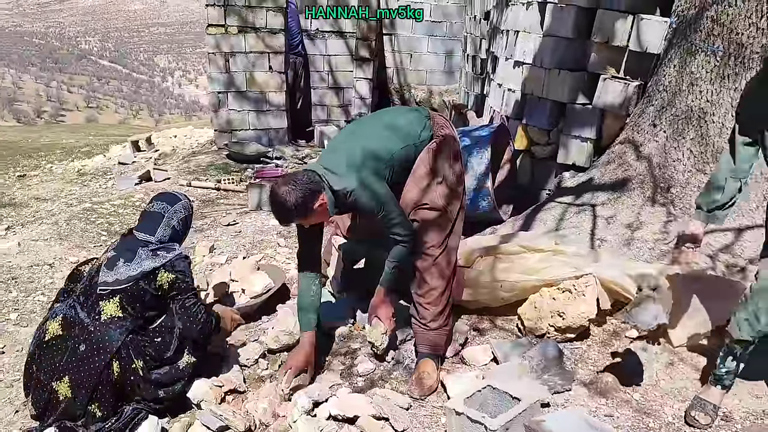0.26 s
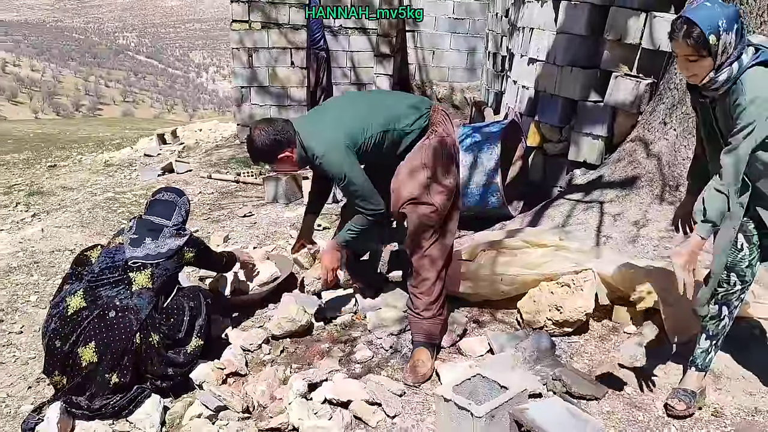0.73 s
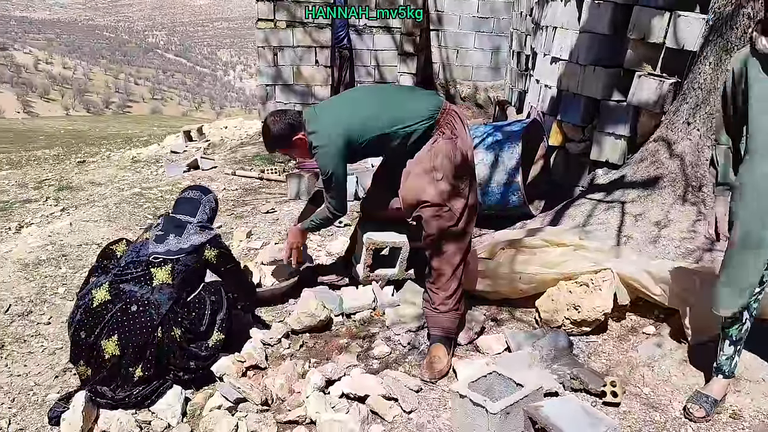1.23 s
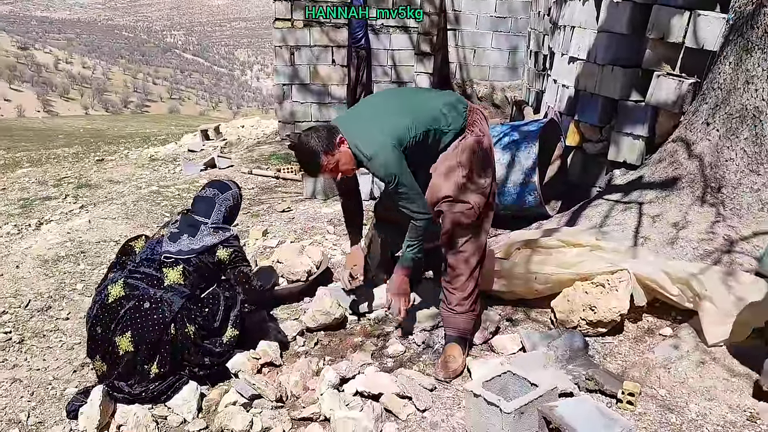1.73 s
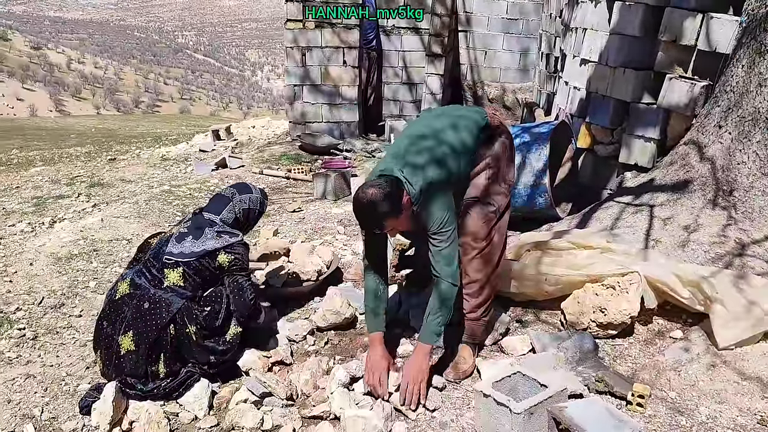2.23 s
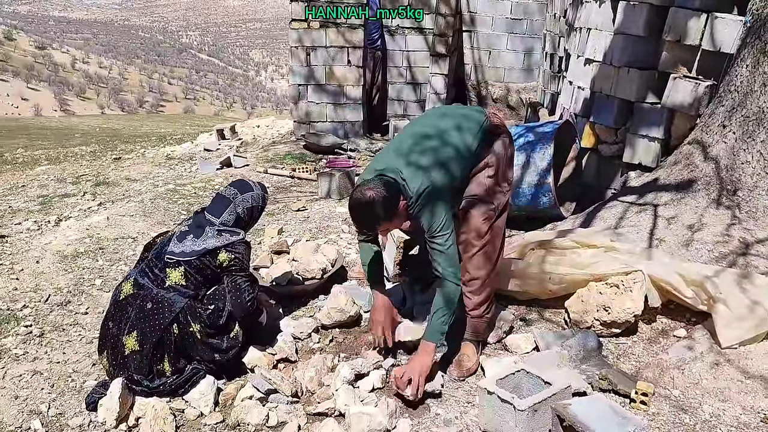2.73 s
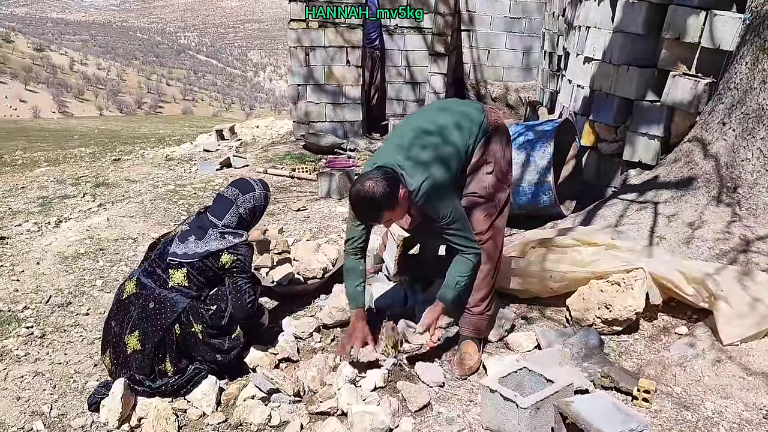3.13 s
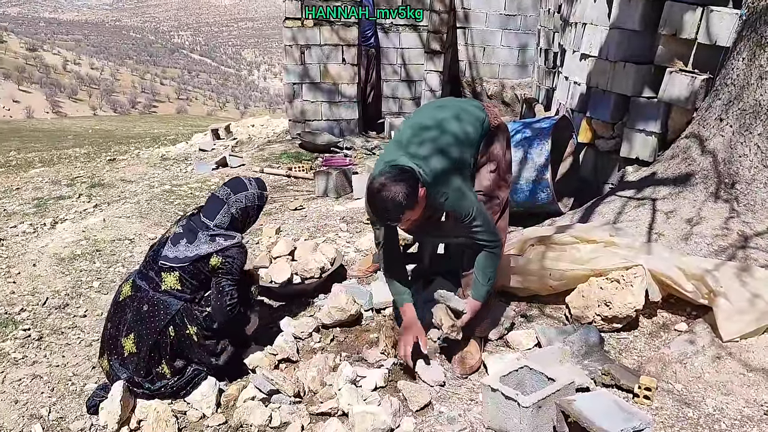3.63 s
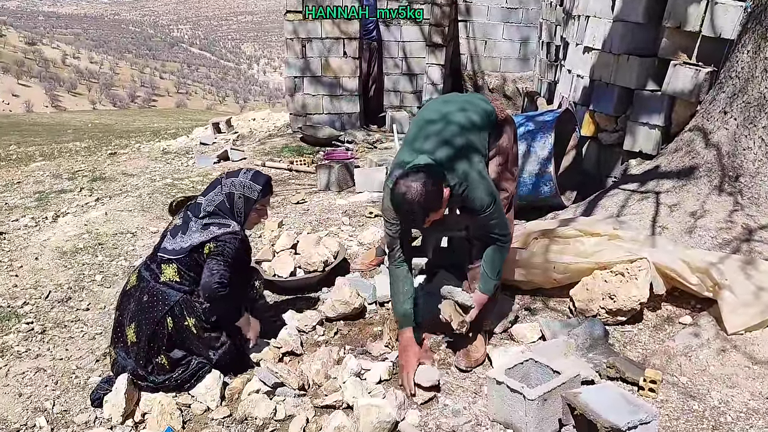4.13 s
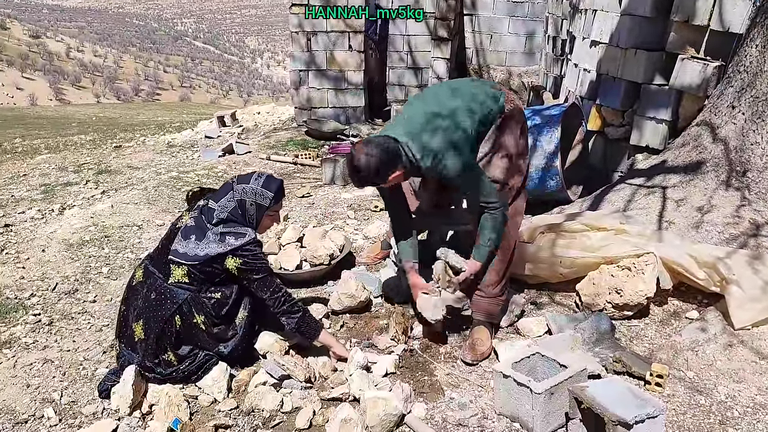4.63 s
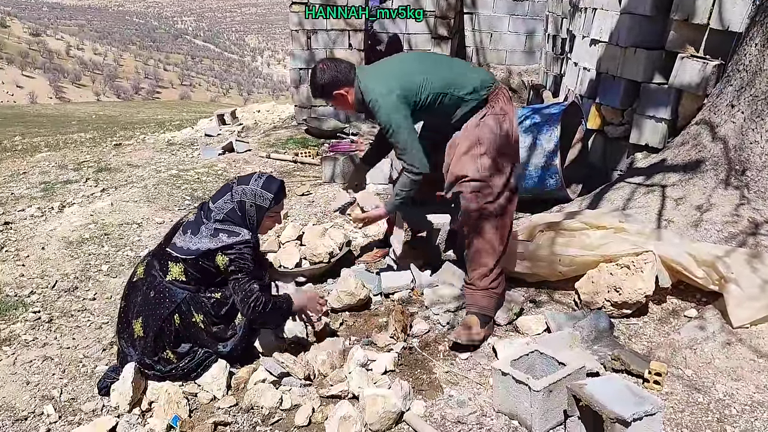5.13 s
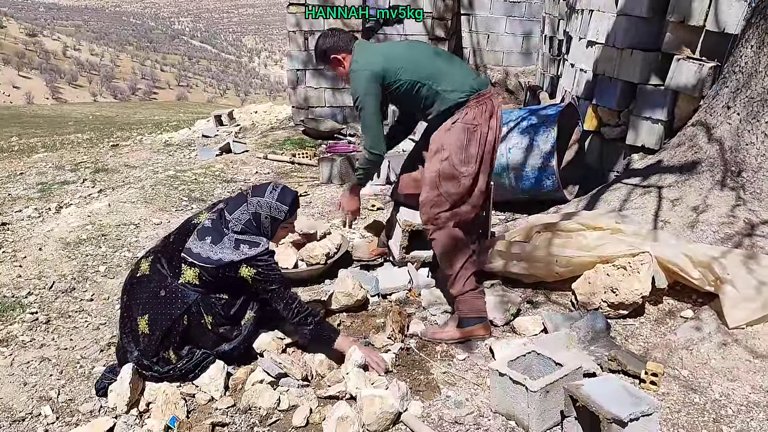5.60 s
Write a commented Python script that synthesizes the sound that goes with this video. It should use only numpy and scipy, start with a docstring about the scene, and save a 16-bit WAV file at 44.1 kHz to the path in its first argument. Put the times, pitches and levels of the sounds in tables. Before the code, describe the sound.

Loose rocks knock and clack onto a heap outdoors, with crunching grit and a breeze buffeting the microphone.

```python
"""Loose rocks drop on a heap outdoors, near a phone with a left and a right microphone opening (port).
From the start the hills hush and a breeze buffets each port on its own. Two flurries of knocks fill the
first two seconds: each stone rings briefly and crunches, grit trickles and a few pebbles clink.
More knocks follow, with the strongest wind thumps near 2.6 and 3.5 s. The knocks then thin out to
light taps, until a last handful lands around 5.5 s."""
import sys
import numpy as np
from scipy import signal
from scipy.fft import rfft, irfft, next_fast_len
from scipy.io import wavfile
from scipy.ndimage import map_coordinates

SR = 44100
rng = np.random.default_rng(int(sys.argv[2]) if len(sys.argv) > 2 else 0)


def put_to_file(sound):
    """Save the sound as 16-bit audio at rate SR, in the file named by the first command-line argument."""
    columns = np.atleast_2d(sound).T  # one column per channel
    safe = np.clip(columns, -1, 1)
    whole_steps = np.round(safe * 32767)
    wavfile.write(sys.argv[1], SR, whole_steps.astype(np.int16))


N = 258426

# Tone of the far hills: (frequency [Hz], level [dB])
HUSH_TONE = [(240, -30), (400, -7), (1240, -15.5), (5390, -32.5), (8200, -35), (13700, -27), (15500, -75)]
# The breeze over time: (time [s], level [dB], left minus right [dB])
BREEZE = [(0.0, -26, -8), (0.08, -42.5, -4.5), (1.37, -36.5, 15.5), (1.82, -34, 0.5), (1.91, -48.5, 6),
          (2.07, -34.5, 9.5), (2.5, -37, -2), (2.7, -30, -12), (2.85, -39, -9), (3.35, -33.5, 14.5),
          (3.56, -35.5, -5), (3.9, -41, -6.5), (4.1, -36.5, 8), (5.26, -35.5, 4.5), (5.45, -29.5, 10),
          (5.61, -36.5, -1), (5.79, -29.5, 2.5)]
# Tone of the wind's low rumble: (frequency [Hz], level [dB])
RUMBLE_TONE = [(20, -13), (118, -2.5), (352, -27), (500, -51.5), (1100, -120)]
# Tone of the flutter in strong gusts: (frequency [Hz], level [dB])
FLUTTER_TONE = [(90, -7.5), (200, 3.5), (350, -15.5), (600, -23), (1200, -53), (2500, -120)]
# Bursts of air on the ports: (time [s], level [dB], pitch [Hz], left minus right [dB])
AIR_BURSTS = [(1.343, -29.5, 139, 15), (1.705, -20.5, 180, -33.5), (2.53, -24, 240, -33),
              (2.6, -10.5, 288, -22), (2.688, -20.5, 310, -35), (2.719, -20.5, 159, 34),
              (2.897, -27, 176, -24), (3.474, -14, 223, -41), (3.559, -20, 163, -15),
              (3.659, -23, 215, -30), (3.964, -18, 248, -34), (3.984, -18, 185, -38),
              (4.736, -25, 195, -23), (4.952, -26.5, 219, -28), (5.424, -18, 152, 16.5),
              (5.633, -19, 159, -34)]
# Hands stir the gravel: (start [s], length [s], trickle level [dB], scrape level [dB])
HAND_STIRS = [(0.375, 0.067, -57, -53), (0.495, 0.65, -69.5, -57), (1.396, 0.33, -71, -58),
              (2.258, 0.87, -70.5, -64), (3.82, 0.28, -77, -70), (4.073, 0.034, -62, -68),
              (4.205, 0.391, -70, -67.5), (4.831, 0.097, -62.5, -74), (5.572, 0.21, -61.5, -66)]
# Gravel between stirs: (trickle level [dB], scrape level [dB])
RESTING_GRIT = [-77, -74]
# Tone of stones scraping: (frequency [Hz], level [dB])
SCRAPE_TONE = [(180, -6.5), (594, -10.5), (778, -14.5), (1670, -18), (2620, -29), (5000, -63),
               (6500, -34.5), (11000, -120)]
# Bright tone of cracks, high pings and trickling grit: (frequency [Hz], level [dB])
BRIGHT_TONE = [(1470, -2), (2500, -4.5), (3740, 0.5), (4410, -0.5), (5870, -8), (7950, -19.5), (9150, -6.5),
               (10800, -10.5), (13300, -12), (14600, -27), (16300, -43)]
# Hard pebbles and flakes that ring on: (time [s], level [dB], pitch [Hz])
PEBBLES = [(0.425, -37.5, 9690), (0.644, -28.5, 1430), (1.057, -50, 5740), (1.122, -54.5, 5670),
           (1.179, -54, 5500), (1.237, -52.5, 5430), (3.501, -51, 11900), (3.528, -40.5, 9280)]
# Rocks landing: (time [s], level [dB], pitch [Hz], crack relative to level [dB], crunch fade [s])
ROCK_HITS = [(0.264, -47, 1470, -24, 0.13), (0.371, -26.5, 1760, -25, 0.19),
             (0.398, -17, 1776, -38.5, 0.01), (0.424, -23.5, 1270, -21, 0.097),
             (0.44, -23.5, 1880, -42, 0.1), (0.513, -25.5, 1424, -5, 0.072), (0.522, -18, 1150, -27, 0.036),
             (0.556, -42, 1010, 0, 0.092), (0.606, -29.5, 1330, -11.5, 0.034),
             (0.644, -27, 1360, -20, 0.094), (0.675, -34.5, 2040, -27, 0.055),
             (0.717, -24.5, 625, -31.5, 0.089), (0.748, -30.5, 1130, -20.5, 0.09),
             (0.8, -33, 1220, -15, 0.17), (0.839, -31.5, 830, -35, 0.13), (0.908, -34.5, 795, -15, 0.054),
             (0.987, -11, 1210, -18.5, 0.019), (0.992, -17.5, 1770, -20, 0.048),
             (1.029, -28.5, 1120, -9, 0.14), (1.07, -20.5, 1410, -43, 0.078), (1.236, -35, 940, -21, 0.077),
             (1.351, -45.5, 1900, -4, 0.26), (1.394, -21.5, 613, -20.5, 0.069),
             (1.418, -18.5, 1090, -38, 0.095), (1.424, -20, 1780, -30, 0.058),
             (1.443, -20, 634, -24.5, 0.071), (1.472, -24.5, 906, -27, 0.15), (1.501, -42, 940, -16, 0.055),
             (1.598, -15, 676, -34.5, 0.056), (1.686, -32, 840, -22, 0.0086),
             (1.723, -33, 915, -19.5, 0.043), (2.195, -23, 1670, -21, 0.053),
             (2.195, -26.5, 574, -29, 0.074), (2.226, -28.5, 1230, -22, 0.16), (2.455, -48, 794, -5, 0.031),
             (2.498, -36.5, 834, -40, 0.11), (2.536, -38, 1110, -4, 0.24), (2.572, -22, 434, -26, 0.075),
             (2.576, -39.5, 1260, -11, 0.34), (2.774, -23.5, 1330, -28.5, 0.017),
             (2.779, -20.5, 1720, -37, 0.014), (2.786, -35, 1270, -40, 0.041),
             (2.991, -45.5, 1970, -9.5, 0.074), (3.019, -50.5, 1196, -3, 0.11),
             (3.162, -28, 1460, -27, 0.04), (3.285, -47, 1510, -32, 0.033), (3.398, -31, 1770, -2, 0.07),
             (3.404, -39.5, 950, -4, 0.054), (3.501, -22, 1180, -29, 0.061), (3.516, -20.5, 904, -23, 0.07),
             (3.526, -19.5, 1180, -32, 0.092), (3.552, -28.5, 1360, -21.5, 0.057),
             (3.798, -28.5, 1260, -37, 0.035), (3.902, -49, 790, -2.5, 0.049),
             (4.019, -36.5, 2030, 2.5, 0.045), (4.212, -35.5, 1945, -14, 0.04),
             (4.427, -45.5, 1980, -14, 0.02), (4.464, -37, 1520, -19.5, 0.026),
             (4.81, -33.5, 796, -2.5, 0.092), (5.435, -45.5, 1930, -11, 0.081),
             (5.523, -37, 940, -12.5, 0.084), (5.53, -18.5, 680, -14, 0.041), (5.586, -49, 2170, 4, 0.29),
             (5.686, -26, 840, -24, 0.27), (5.702, -21, 1416, -13.5, 0.064), (5.716, -22, 885, -47, 0.093),
             (5.733, -26.5, 1500, -38, 0.11)]
# The notes one stone rings with: (multiple of its pitch [ratio], level [dB], base fade [s])
STONE_NOTES = [(.6, -1, 0.014), (1, 4, 0.018), (1.299, -18, 0.034), (1.15, 2, 0.0036)]
# Echo off the heap and a wall: (frequency [Hz], fade [s])
ECHO_FADES = [(500, 0.31), (10000, 0.14)]
# Which port hears the heap louder: (frequency [Hz], left minus right [dB])
PORT_BALANCE = [(1220, 1.5), (2010, 8), (3330, -5), (5500, 11.5), (9080, -12), (15000, 0)]
# The left port lags in the treble: (frequency [Hz], left minus right phase [radians])
PORT_PHASE = [(2400, 0), (6100, -6), (9800, -9.5), (15000, -14.5)]

SIDE = np.array([[.5], [-.5]])  # shares a left-right difference between the two ports
HIT_SAMPLES = 8192
HIT_TIME, HIT_HZ = np.arange(HIT_SAMPLES) / SR, np.fft.rfftfreq(HIT_SAMPLES, 1 / SR)


def amp(db):
    """Turn decibels into a volume multiplier."""
    return 10 ** (np.asarray(db) / 20)


def fade(t, fade_s):
    """Die away by 60 dB every fade_s seconds; all fade times here mean this."""
    return amp(-60 * t / fade_s)


def strike(rise_s, fade_s):
    """The loudness of one hit: a quick rise, then a fade."""
    return (1 - np.exp(-HIT_TIME / rise_s)) * fade(HIT_TIME, fade_s)


def unit(x):
    """Scale a sound to an average strength (rms) of 1."""
    return x / np.sqrt(np.mean(x ** 2, axis=-1, keepdims=True) + 1e-20)


def along(table, hz):
    """Read between the rows of a (frequency, value) table, on a musical scale."""
    freqs, values = np.transpose(table)
    return np.interp(np.log(hz + 1), np.log(freqs + 1), values)


def wobble(rate):
    """A smooth curve through `rate` random values a second."""
    return map_coordinates(rng.standard_normal(N // 100), [np.arange(N) * rate / SR])


def filtered(x, response):
    """Multiply each frequency in a sound by response(frequency)."""
    size = next_fast_len(N + 8192)
    return irfft(rfft(x, size) * response(np.fft.rfftfreq(size, 1 / SR)), size)[..., :N]


def coloured(x, tone):
    """Give a sound the tone in a table, at strength 1."""
    return unit(filtered(x, lambda hz: amp(along(tone, hz))))


def add(track, time_s, sound):
    """Mix a sound into both channels of a track, starting at time_s."""
    part = track[:, round(time_s * SR):][:, :sound.shape[-1]]
    part += sound[..., :part.shape[1]]


def piece(noise, time_s, samples=HIT_SAMPLES):
    """Cut out a piece of noise, with silence past its end."""
    part = noise[:, round(time_s * SR):][:, :samples]
    return np.pad(part, ((0, 0), (0, samples - part.shape[1])))


def grains(clump_db, spike_db, clump_rate, apart):
    """Many tiny contacts make clumpy, spiky noise; `apart` sets how much the two ports differ."""
    shared, left, right = rng.standard_normal((3, N))
    loudness = amp(clump_db * wobble(clump_rate) + spike_db * wobble(400))
    return loudness * (shared + apart * np.array([left, right]))


def hills():
    """A faint, steady hush from far away."""
    return amp(-69.5) * coloured(rng.standard_normal((2, N)), HUSH_TONE)


def thumps(flutter):
    """A swirl of air passes the ports: a few slowing swings and a ragged wake."""
    out = np.zeros((2, N))
    t = np.arange(-2000, 2400) / SR
    for time_s, db, hz, pan_db in AIR_BURSTS:
        cycles = t * hz - .8
        swell = np.exp(-np.hypot(cycles / 0.5, 0.22) ** 0.81)
        swings = np.sin(2 * np.pi * cycles * (1.4 - 0.32 * cycles))
        wake = 0.38 * np.exp(-(cycles / 2.2) ** 2) * piece(flutter, time_s + t[0], len(t))
        port_gain = amp(db + np.minimum([[pan_db], [-pan_db]], 0))
        add(out, time_s + t[0], port_gain * (swell * swings + wake))
    return out


def wind():
    """Lumpy air rumbles and thumps on each port; strong gusts reach higher, and the left is duller."""
    def per_port(rate):
        return np.array([wobble(rate), wobble(rate)])

    times, *columns = np.transpose(BREEZE)
    level_db, pan_db = (np.interp(np.arange(N) / SR, times, column) for column in columns)
    gust_db = level_db + np.minimum([pan_db, -pan_db], 0)
    gust_db += 10 * np.tanh(0.4 * per_port(16)) + 2.63 * per_port(45)
    rumble = filtered(rng.standard_normal((2, N)),
                      lambda hz: amp(along(RUMBLE_TONE, hz) - SIDE * 4.4 * np.log2((hz + 1) / 100)))
    flutter = coloured(rng.standard_normal((2, N)), FLUTTER_TONE) * amp(2.9 * per_port(30))
    flutter_db = 1.67 * (gust_db + 38.5) - 53 - 12 * SIDE  # grows faster than the rumble
    return amp(gust_db) * unit(rumble) + amp(flutter_db) * flutter + thumps(flutter)


def echo(x):
    """Sound scatters off heap and wall: a short tail, new for each port and each quarter second."""
    out, step = np.zeros((2, N)), SR // 4
    for start in range(0, N, step):
        hz, t, noise = signal.stft(rng.standard_normal((2, step)), SR, nperseg=128)
        tail = signal.istft(noise * fade(t, along(ECHO_FADES, hz)[:, None]), SR, nperseg=128)[1]
        tail /= np.linalg.norm(tail[0])
        add(out, (start + 90) / SR, signal.fftconvolve(x[None, start:start + step], tail, axes=1))
    return out


def grit(rise_s=0.033, fade_s=0.13):
    """Fine gravel trickles between the stones and makes them scrape, more while a hand stirs it."""
    t = np.arange(N) / SR
    flow = amp(RESTING_GRIT)[:, None]
    for start_s, length_s, *levels_db in HAND_STIRS:
        swell = np.clip((t - start_s) / rise_s, 0, 1)
        dying = fade(np.maximum(t - start_s - length_s, 0), fade_s)
        flow = flow + amp(levels_db)[:, None] * swell * dying
    trickle = grains(clump_db=4.5, spike_db=4.5, clump_rate=78, apart=1)
    scrape = grains(clump_db=1, spike_db=4.5, clump_rate=15, apart=1)
    return flow[0] * coloured(trickle, BRIGHT_TONE) + flow[1] * coloured(scrape, SCRAPE_TONE)


def clinks():
    """A hard pebble rings with its own note and a softer one just below."""
    out = np.zeros((2, N))
    for time_s, db, hz in PEBBLES:
        phase = 2 * np.pi * hz * HIT_TIME
        notes = np.sin(phase) + amp(-8.5) * np.sin(0.93 * phase)
        add(out, time_s, amp(db) * strike(rise_s=0.0012, fade_s=0.045) * notes)
    return out


def high_pings():
    """Each hit carries a brief high ring of eight random pitches."""
    out = np.zeros((2, N))
    for time_s, db, _, crack_db, _ in ROCK_HITS:
        ping_hz = 3000 * 4.5 ** rng.random((8, 1))
        pings = np.sin(2 * np.pi * ping_hz * HIT_TIME).sum(axis=0)
        add(out, time_s, amp(db + crack_db - 9.5) * strike(rise_s=0.00057, fade_s=0.016) * pings)
    return out


def settling(crunch_s):
    """The loudness of gravel giving way under a stone: it swells, then fades."""
    swell = 1 - np.exp(-(HIT_TIME / (0.026 * crunch_s)) ** 2)
    return swell * fade(HIT_TIME, max(crunch_s, .01))


def looseness(crunch_s):
    """A stone that takes long to settle grinds more and rings less."""
    return (crunch_s / 0.067) ** 0.3


def cracks(lead_in_s=0.0053, bands=8):
    """Each crack fades in faintly over about 5 ms, then snaps and crackles in the gravel."""
    out = np.zeros((2, N))
    splinters = grains(clump_db=1, spike_db=3.5, clump_rate=71, apart=0.88)
    lead_in_rise = amp(np.linspace(-28, -14, round(lead_in_s * SR)))
    snap = 1.45 * fade(HIT_TIME, 0.023) * (1 - np.exp(-(HIT_TIME / 0.0016) ** 2))
    band_hz = HIT_HZ[-1] * np.linspace(0, 1, bands) ** 2
    for time_s, db, _, crack_db, crunch_s in ROCK_HITS:
        gain = amp(db + crack_db)
        lead_in = lead_in_rise * piece(splinters, time_s - lead_in_s, len(lead_in_rise))
        add(out, time_s - lead_in_s, gain * lead_in)
        tone = amp(3 * np.interp(HIT_HZ, band_hz, rng.standard_normal(bands)))  # new for every crack
        crackle = irfft(rfft(piece(splinters, time_s)) * tone)
        add(out, time_s, gain * (snap + 0.4 * settling(crunch_s)) * crackle)
    return out


def crunches():
    """A stone grinds into the gravel, which shakes it broadly around its own pitch."""
    out = np.zeros((2, N))
    rubble = grains(clump_db=0, spike_db=3, clump_rate=90, apart=0.7)
    scrape_tone = amp(along(SCRAPE_TONE, HIT_HZ) + 16)
    for time_s, db, hz, _, crunch_s in ROCK_HITS:
        grinding = settling(crunch_s) * piece(rubble, time_s)
        resonance = 0.56j * HIT_HZ * hz / (hz ** 2 - HIT_HZ ** 2 + 0.83j * HIT_HZ * hz)
        crunch = irfft(rfft(grinding) * (resonance + 0.5) * scrape_tone)
        add(out, time_s, amp(db - 3) * looseness(crunch_s) * crunch)
    return out


def knocks():
    """A struck stone rings with a few short notes, then bounces once about 4 ms later."""
    out = np.zeros((2, N))
    for time_s, db, hz, _, crunch_s in ROCK_HITS:
        detunes, strengths, bounce = rng.standard_normal((3, len(STONE_NOTES)))
        damping = (0.13 / crunch_s) ** 0.2  # a short, held contact stops the ring sooner
        ring = np.zeros(HIT_SAMPLES)
        for (ratio, note_db, fade_s), detune, strength in zip(STONE_NOTES, detunes, strengths):
            if ratio != 1:  # all but the main note vary from hit to hit
                ratio *= 1 + 0.056 * detune
                note_db += 3 * strength
            note = np.sin(2 * np.pi * hz * ratio * HIT_TIME)
            ring += amp(note_db) * strike(rise_s=0.00078, fade_s=fade_s / damping) * note
        add(out, time_s, amp(db - 6) * ring / looseness(crunch_s))
        add(out, time_s + 0.00395 + 0.00095 * bounce[0], amp(db - 19.5 + 5 * bounce[1]) * ring)
    return out


def scene():
    """The heap reaches each port with its own tone and delay; wind blows on the ports directly."""
    def at_ports(hz):
        return amp(SIDE * along(PORT_BALANCE, hz)) * np.exp(1j * SIDE * along(PORT_PHASE, hz))

    rings, pings, gravel = knocks(), high_pings(), crunches()
    bright = filtered(cracks() + pings, lambda hz: amp(along(BRIGHT_TONE, hz) + 6))
    heap = rings + gravel + bright + clinks() + grit()
    return hills() + filtered(heap + amp(-12.5) * echo(heap.mean(axis=0)), at_ports) + wind()


def record(dry):
    """The phone keeps nothing above 16300 Hz."""
    return filtered(dry, lambda hz: hz < 16300)


dry = scene()
out = record(dry)
put_to_file(out)
```